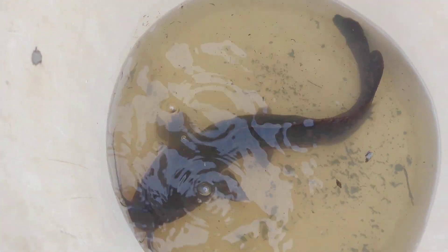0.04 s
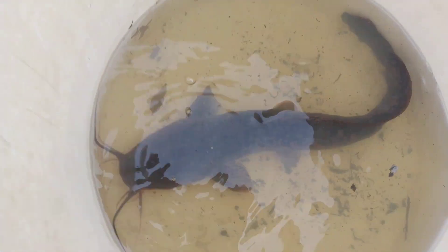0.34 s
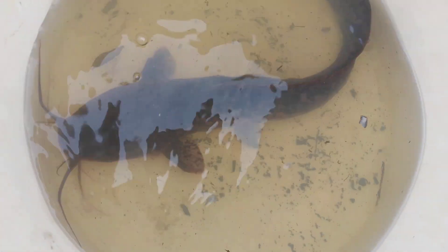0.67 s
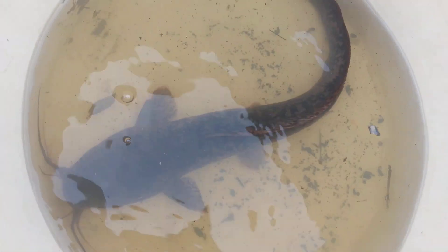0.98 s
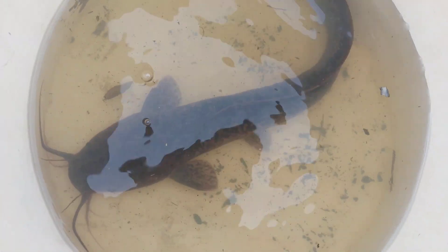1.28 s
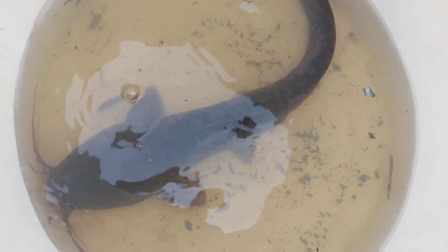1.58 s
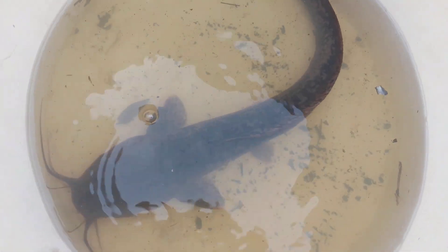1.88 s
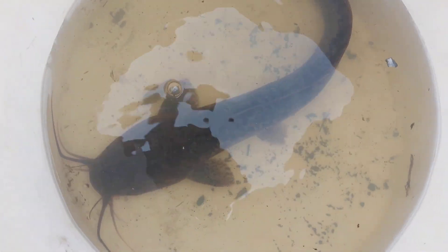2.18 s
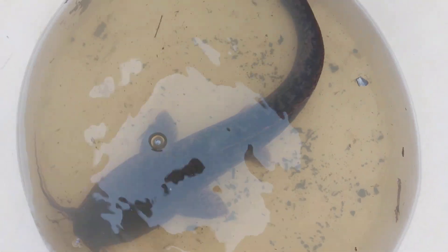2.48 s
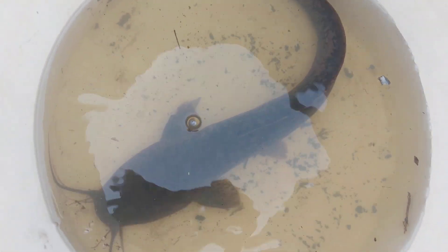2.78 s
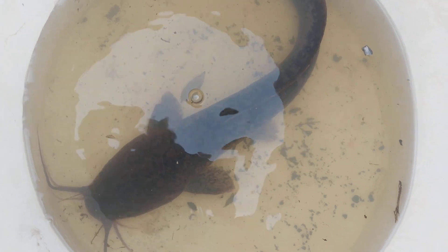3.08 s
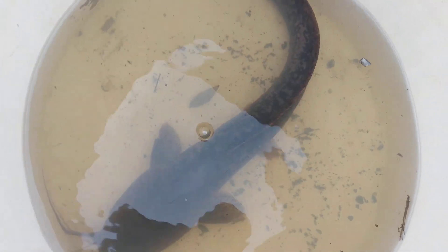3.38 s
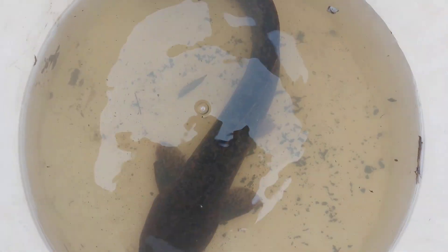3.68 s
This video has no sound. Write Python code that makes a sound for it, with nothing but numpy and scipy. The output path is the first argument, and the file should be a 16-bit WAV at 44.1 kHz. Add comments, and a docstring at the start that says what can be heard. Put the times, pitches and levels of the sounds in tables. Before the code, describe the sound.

A catfish croaks repeatedly in harsh, squeaky rasps over a faint low rumble.

```python
"""A tub of shallow water between hard walls, the microphone close to a catfish; a motor drones far off.
After a brief tick the fish croaks nine times, grinding a fin spine in its socket. The joint sticks and
slips a few thousand times a second: a gliding squeak that breaks into a harsh rasp and rings a lower and
an upper resonance, echoed by tub and walls. Around 1.5 s the motor swells and the dragging spine growls;
near 2.7 s the spine bites hard and its overtones flare. The last croak dies away at 3.6 s."""
import sys
import numpy as np
from scipy import signal
from scipy.fft import rfft, irfft, next_fast_len
from scipy.io import wavfile
from scipy.ndimage import uniform_filter1d

SR = 44100
rng = np.random.default_rng(int(sys.argv[2]) if len(sys.argv) > 2 else 0)


def to_wav(s):
    """Save 16-bit WAV."""
    ch = np.atleast_2d(s).T  # columns
    pcm = np.round(np.clip(ch, -1, 1) * 32767)  # PCM
    wavfile.write(sys.argv[1], SR, pcm.astype(np.int16))


N = 169785
T = np.arange(N) / SR


def undb(db):
    """Decibels to gain."""
    return 10 ** (np.asarray(db) / 20)


def curve(rows, col=1):
    """Straight lines in time through the rows."""
    rows = np.array(rows, float)
    return np.interp(T, np.sort(rows[:, 0]), rows[:, col])


def swells(rows):
    """Gain of a few bell-shaped swells."""
    return sum(undb(db) * np.exp(-((T - at) / half) ** 2) for at, half, db in rows)


def unit(x):
    """Scale to rms 1."""
    return x / np.sqrt(np.mean(x ** 2))


def even(x, size):
    """Hold the rms near 1 over stretches of `size` samples."""
    return x / np.sqrt(np.abs(uniform_filter1d(x ** 2, size)) + np.mean(x ** 2) / 20)


def colour(x, points):
    """Filter by an outline of f/Hz, level/dB."""
    hz, db = np.array(points, float).T
    size = next_fast_len(N + 8192)
    f = np.arange(size // 2 + 1) * SR / size + 1
    gain = undb(np.interp(np.log(f), np.log(hz), db))
    return irfft(rfft(x, size) * gain, size)[:N]


def walk(per_s):
    """Random wander with `per_s` turns a second and rms 1."""
    steps = rng.standard_normal(N // 8)
    return unit(np.interp(T * per_s, np.arange(len(steps)), steps))


# The motor's loudness at the microphone: t/s, level/dB
MOTOR_LEVEL = [(0, -49), (.42, -60), (.62, -47.5), (.85, -57.5), (1.3, -52.5), (1.4, -40.5), (1.63, -44),
               (1.75, -50.5), (3.35, -55.5), (3.65, -48.5)]
# Spectrum of its rumble: f/Hz, level/dB
RUMBLE_SPECTRUM = [(48, -19.5), (66, -2.5), (100, 1.5), (200, -21.5), (430, -49), (600, -30), (760, -65.5)]
def distant_motor(hum_hz=102):
    """Far off, a motor's wavering hum in low rumble, with a faint, steady airy whine above it."""
    hz = hum_hz * (1 + 0.02866 * walk(per_s=16))
    hum = np.sqrt(2) * np.sin(2 * np.pi * np.cumsum(hz) / SR)
    rumble = even(colour(rng.standard_normal(N), RUMBLE_SPECTRUM), size=5000)
    whine = unit(colour(rng.standard_normal(N), [(740, -19), (840, -1.5), (980, -19), (4000, -55)]))
    return undb(curve(MOTOR_LEVEL)) * (undb(-1.5) * hum + undb(-0.5) * rumble) + undb(-80) * whine


def reflections(x, t60_s, gap_s, echo_db):
    """Hard surfaces add dense echoes after a gap, `echo_db` relative to the direct sound."""
    t = T[:SR // 2]
    onset = np.clip(t / gap_s - 1, 0, 1)
    tail = rng.standard_normal(len(t)) * np.exp(-np.log(1000) * t / t60_s) * onset
    echoes = signal.fftconvolve(x, tail / np.sqrt(np.sum(tail ** 2)))[:N]
    return (x + undb(echo_db) * echoes) / np.hypot(1, undb(echo_db))


# Where the spine drags: middle t/s, half length/s, level/dB
DRAGS = [(1.5, 0.17, -53), (1.854, 0.046, -52)]
# Spectrum of the growl: f/Hz, level/dB
GROWL_SPECTRUM = [(700, -12), (1230, 0.5), (2400, -44.5)]
def growl(phase, catches):
    """The dragging spine growls: a jerky tone at half the slip rate, its low side brought out."""
    return swells(DRAGS) * even(colour(np.sin(phase / 2) * catches, GROWL_SPECTRUM), size=500)


# Where the spine bites: middle t/s, half length/s, level/dB
HARD_BITES = [(2.655, .08, -55)]
# Spectrum of the flare: f/Hz, level/dB
FLARE_SPECTRUM = [(7000, -40), (11000, -9)]
def bite(slips):
    """The spine bites hard and its overtones flare."""
    return swells(HARD_BITES) * unit(colour(slips, FLARE_SPECTRUM))


def resonance(slips, spectrum, shift=.11):
    """One resonance drifts between slack and taut as the joint turns; rms near 1."""
    tension = (1 + np.tanh(2 * walk(per_s=22))) / 2
    slack = colour(slips, [(hz * (1 - shift), db) for hz, db in spectrum])
    taut = colour(slips, [(hz * (1 + shift / 2), db) for hz, db in spectrum])
    return even(slack * (1 - tension) + taut * tension, size=500)


# The opening tick, then one curve per croak: t/s, lower resonance level/dB, upper resonance level/dB
STROKE_LEVELS = [
    [(0.0031, -33.5, -40)],
    [(.19, -45.5, -43.5), (.295, -33, -27), (.37, -28, -32), (.41, -47, -41), (.5, -34, -46)],
    [(.618, -33.5, -45.5), (.671, -37.5, -35), (.676, -23, -32), (.745, -34.5, -27), (.795, -50, -27.5),
     (.815, -29.5, -37.5), (.938, -35, -46), (.948, -70, -22.5), (.965, -33.5, -33), (1.09, -37, -47)],
    [(1.152, -27, -30.5), (1.275, -29.5, -27.5)],
    [(1.39, -35, -59), (1.478, -34.5, -65), (1.483, -26, -40.5), (1.52, -30, -32.5), (1.56, -28, -42),
     (1.63, -40.5, -51.5), (1.655, -24, -25.5), (1.76, -30, -41), (1.87, -33.5, -48.5), (1.91, -35, -63)],
    [(1.964, -26, -36.5), (2.06, -31.5, -29), (2.09, -63, -31.5), (2.138, -31, -22)],
    [(2.253, -29, -27), (2.375, -28.5, -29)],
    [(2.51, -39, -41), (2.585, -30.5, -27.5), (2.748, -38, -32.5), (2.758, -53.5, -23.5),
     (2.795, -27.5, -26), (2.86, -27.5, -39.5), (2.915, -33, -51), (2.95, -24.5, -35), (3.01, -41, -73.5)],
    [(3.07, -38.5, -53), (3.17, -32.5, -29.5), (3.22, -34.5, -31.5), (3.255, -28.5, -24), (3.3, -32, -29)],
    [(3.39, -29, -28), (3.5, -31, -28.5), (3.57, -41.5, -63)],
]
def strokes(col, attack_s=.005, release_s=.011):
    """Gain of one resonance through the strokes of the fin, each starting and stopping quickly."""
    gain = 0
    for rows in STROKE_LEVELS:
        before = np.maximum(rows[0][0] - T, 0) / attack_s
        after = np.maximum(T - rows[-1][0], 0) / release_s
        gain = gain + undb(curve(rows, col)) * np.exp(-before - after)
    return gain


# Spectra of the two resonances: f/Hz, level/dB
LOWER_SPECTRUM = [(900, -38.5), (1900, -14), (2500, 1), (3600, 6), (4500, -11), (6500, -50)]
UPPER_SPECTRUM = [(3600, -46), (5200, 1), (7500, 10), (9000, -7), (12000, -22.5), (15000, -38)]
def ringing(slips):
    """The slips ring a lower and an upper resonance, each with its own loudness."""
    lower = resonance(slips, LOWER_SPECTRUM) * strokes(col=1)
    upper = resonance(slips, UPPER_SPECTRUM) * strokes(col=2)
    return lower + upper


def skids(per_s=65, depth=.6):
    """Log pitch offset: the joint jumps ahead and slides back in a run of falling chirps."""
    count = np.cumsum(per_s * np.exp(.5 * walk(per_s))) / SR
    slide = (1 - count % 1) ** 2
    return depth * (slide - slide.mean())


WOBBLES_PER_S = 190
# Slip rate of the joint, one curve per croak: t/s, f/Hz
SLIP_RATES = [
    [(.17, 4400), (.215, 5100), (.225, 2500), (.365, 3700), (.48, 3310)],
    [(.615, 2650), (.665, 2100), (.672, 3300), (.715, 2700), (.742, 3750), (.768, 3750), (.783, 2850),
     (.79, 3750), (.87, 2758), (.941, 2980), (.947, 6500), (.958, 8400), (.961, 2900)],
    [(1.145, 3700), (1.165, 3063)],
    [(1.5, 3700), (1.625, 2400), (1.643, 4800), (1.66, 3500), (1.715, 2600), (1.73, 3600)],
    [(1.95, 2500), (1.975, 3550), (2.012, 3400), (2.02, 2350), (2.079, 2330), (2.085, 7000), (2.125, 8900),
     (2.143, 3600)],
    [(2.24, 3800), (2.26, 3000)],
    [(2.505, 2300), (2.555, 1750), (2.578, 3900), (2.6, 2800), (2.63, 3450), (2.658, 1950), (2.685, 2800),
     (2.748, 2400), (2.755, 5500), (2.789, 4610), (2.796, 2996), (2.83, 4200), (2.875, 2600)],
    [(3.07, 2550), (3.188, 2380), (3.199, 8200), (3.235, 8200), (3.243, 2800), (3.259, 8370), (3.285, 6340)],
    [(3.38, 4300), (3.41, 3050)],
]
def stick_slip(rough, db_per_octave=-1):
    """The joint's squeak and its phase; when rough, the period scatters, slips skip and it scrapes."""
    jitter = .1 * walk(per_s=1500)
    wobble = .12 * walk(WOBBLES_PER_S)
    hz = curve(sum(SLIP_RATES, [])) * np.exp(rough * (jitter + wobble + skids()))
    phase = 2 * np.pi * np.cumsum(hz) / SR
    squeak = 0
    for k in range(1, 8):
        alias_guard = np.clip((SR / 2 - k * hz) / (SR / 10), 0, 1)
        squeak = squeak + undb(db_per_octave * np.log2(k)) * np.sin(k * phase) * alias_guard
    skipping = 1 + undb(-1) * np.sqrt(rough) * walk(WOBBLES_PER_S) * np.sin(phase / 2)
    scrape = undb(-8) * rough * rng.standard_normal(N)
    return squeak * skipping + scrape, phase


# Roughness of the joint: t/s, roughness (0 clean squeak, 1 rasp)
ROUGHNESS = [(.1, 1), (.19, .2), (.29, .8), (.7, .25), (.87, 1), (.95, .1), (.98, 1), (1.6, .9),
             (1.66, .25), (1.85, 1), (1.96, .45), (2.13, .12), (2.26, 1), (2.51, .35), (2.73, .4),
             (2.77, .1), (2.86, .8), (3.07, .5), (3.25, .15), (3.41, .9)]
def catfish():
    """Close by, the fin spine grinds in its socket; the rougher it runs, the harder it catches in jerks."""
    rough = curve(ROUGHNESS)
    slips, phase = stick_slip(rough)
    catches = even(undb(4 * np.sqrt(rough) * walk(WOBBLES_PER_S)), size=900)
    return growl(phase, catches) + catches * (ringing(slips) + bite(slips))


def scene():
    """At one microphone: the croaks ring in the tub, then between the walls, over the distant motor."""
    in_tub = reflections(catfish(), t60_s=.03, gap_s=.00034, echo_db=-8)
    in_room = reflections(in_tub, t60_s=.22, gap_s=.0034, echo_db=-1.5)
    return (in_room + distant_motor())[None]


def record(dry):
    """The recorder cuts the treble steeply above 15.7 kHz."""
    return signal.sosfilt(signal.ellip(8, .2, 80, 15700, fs=SR, output="sos"), dry)


dry = scene()
out = record(dry)
to_wav(out)
```